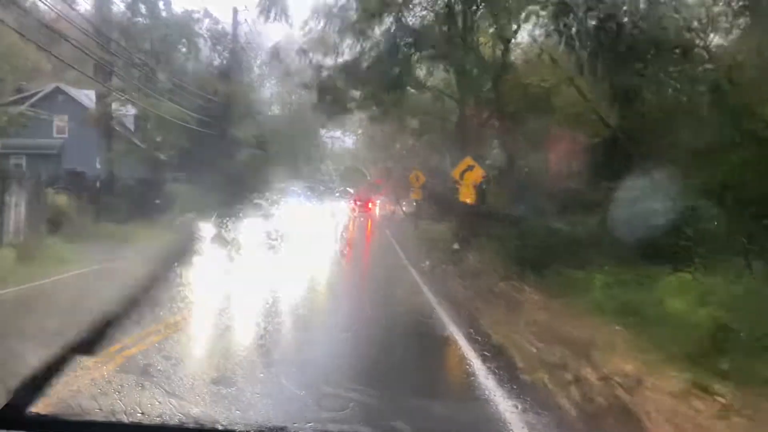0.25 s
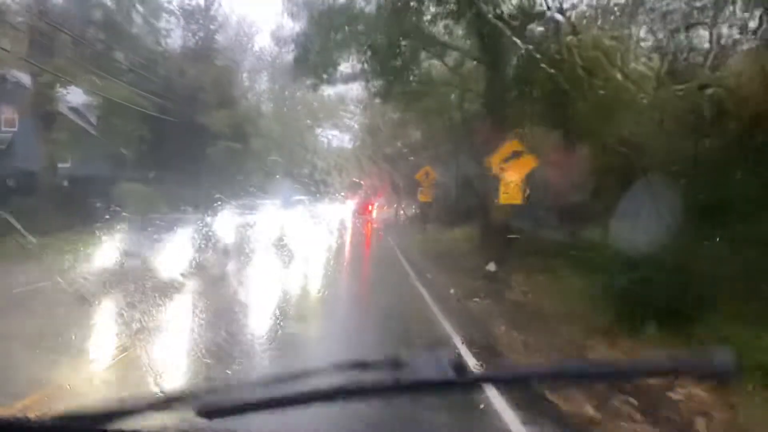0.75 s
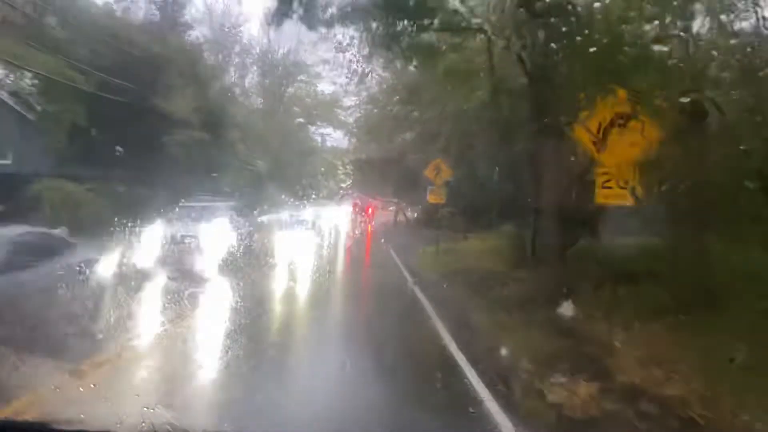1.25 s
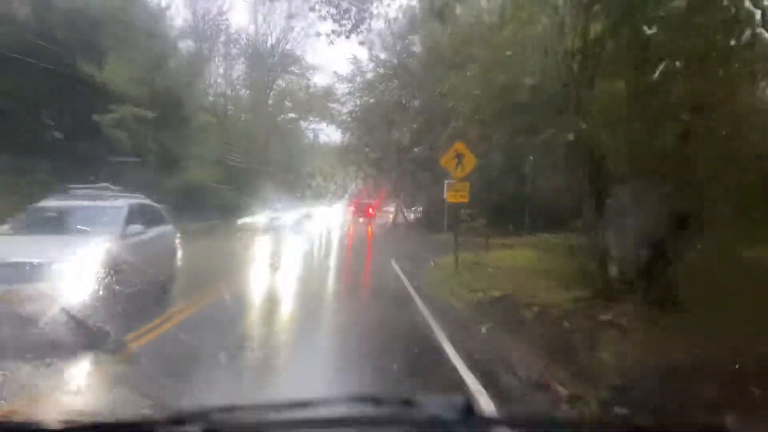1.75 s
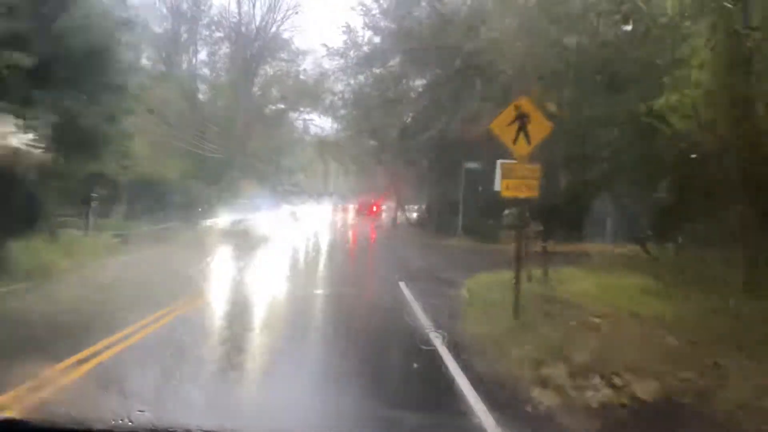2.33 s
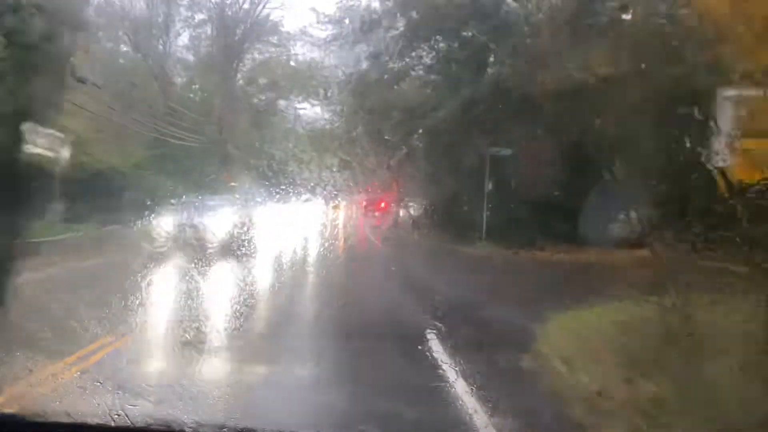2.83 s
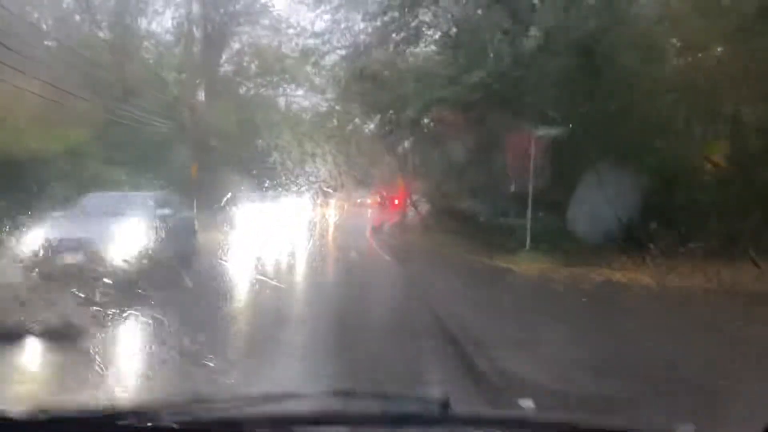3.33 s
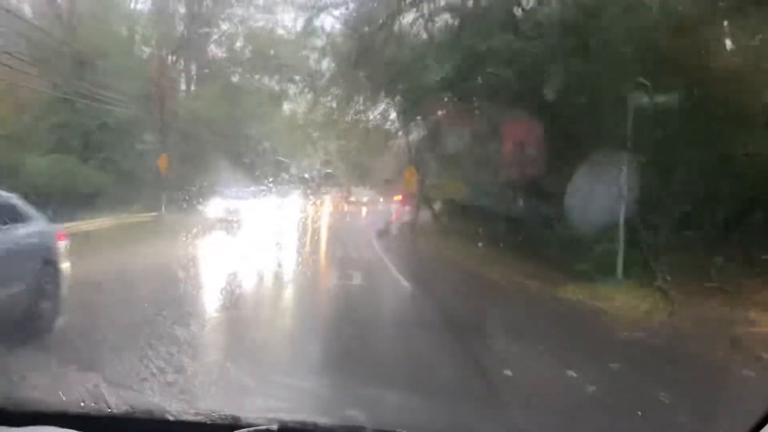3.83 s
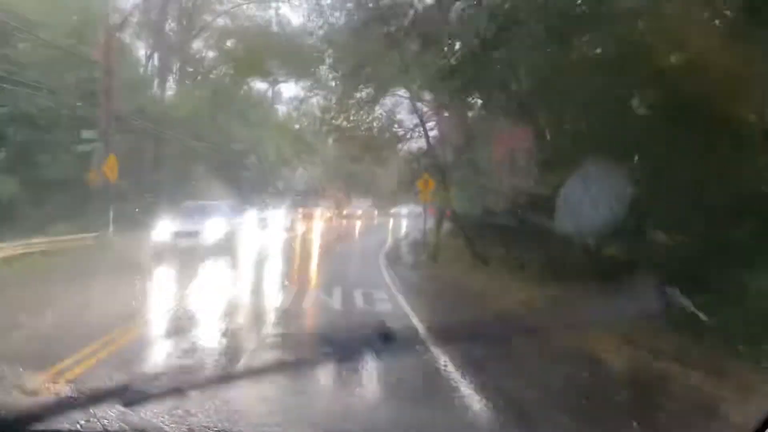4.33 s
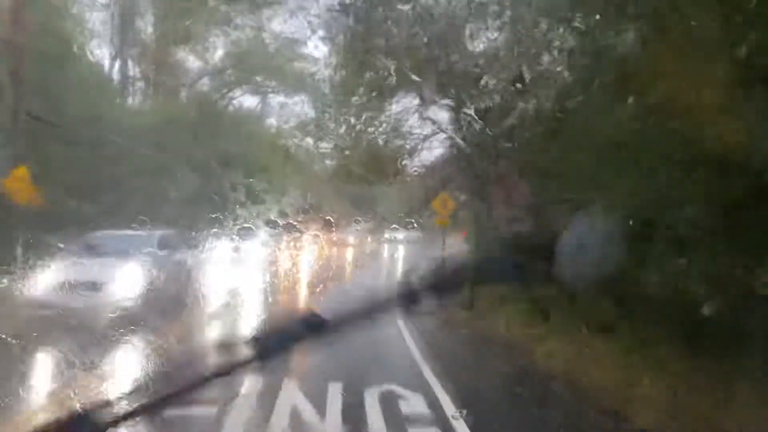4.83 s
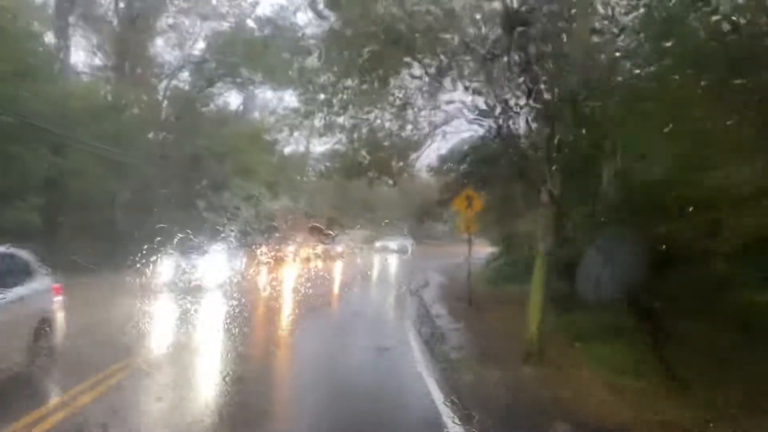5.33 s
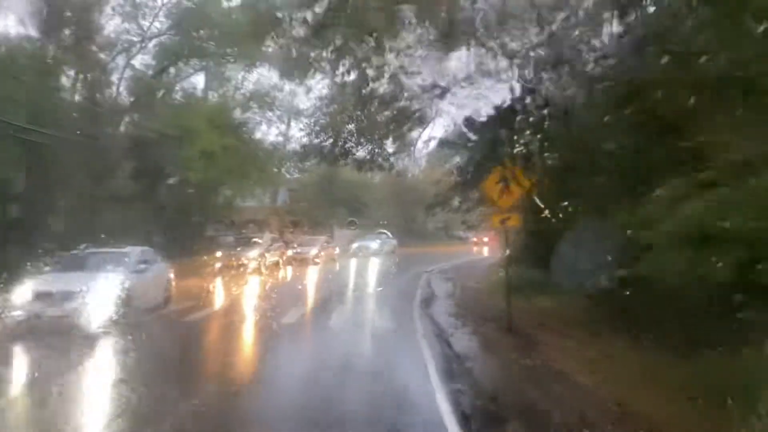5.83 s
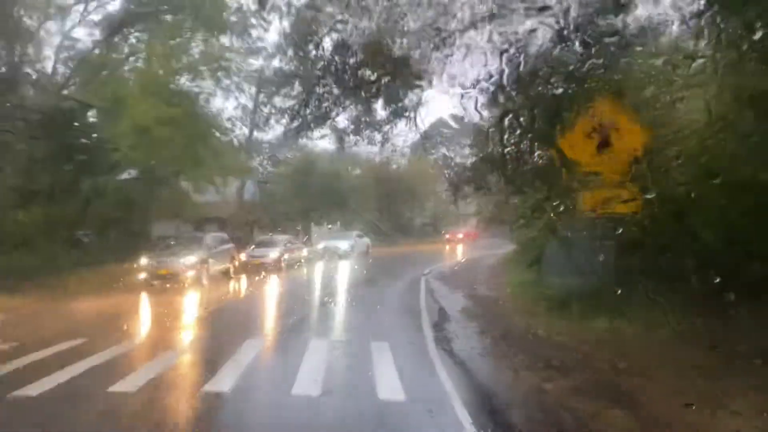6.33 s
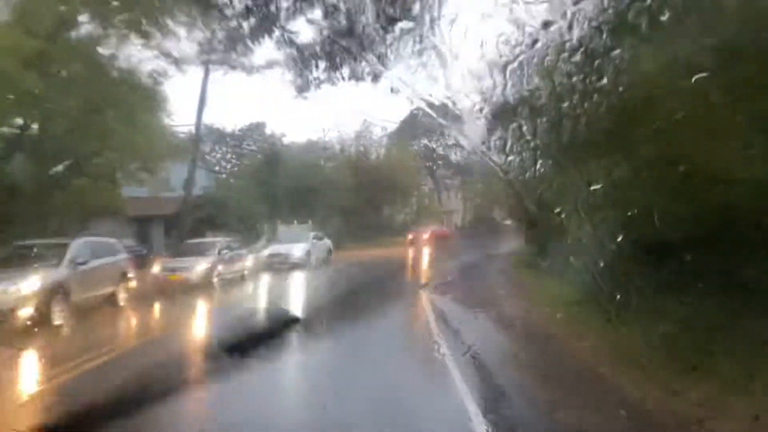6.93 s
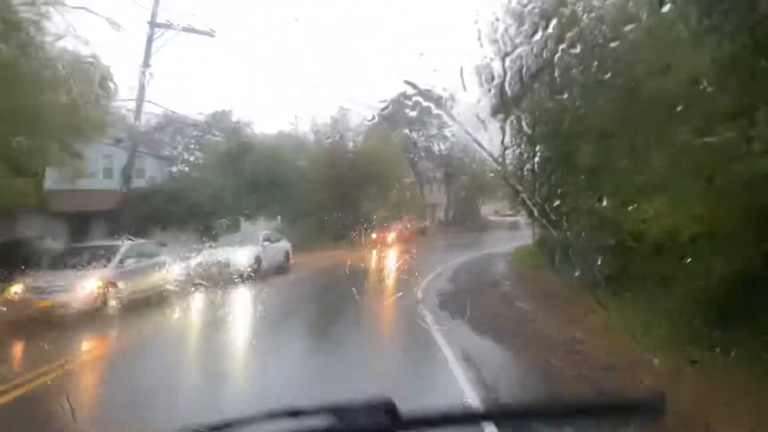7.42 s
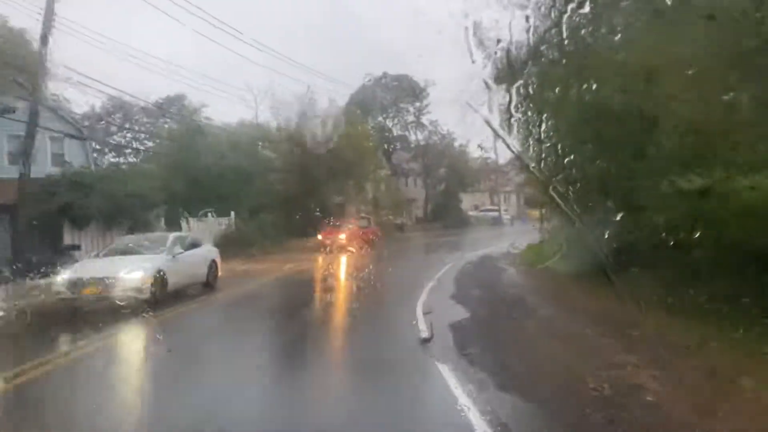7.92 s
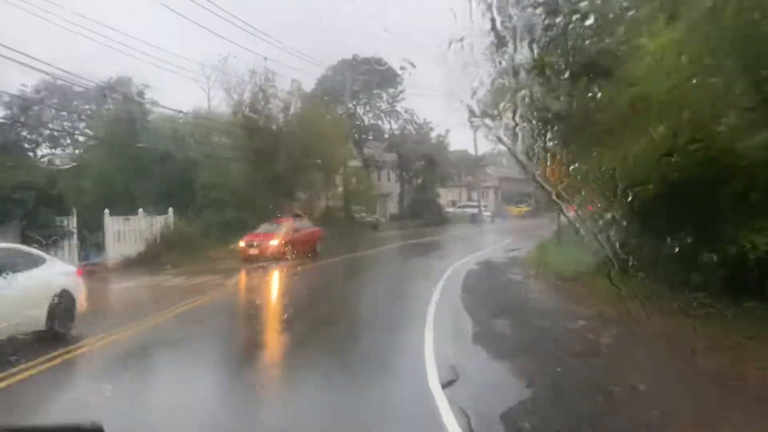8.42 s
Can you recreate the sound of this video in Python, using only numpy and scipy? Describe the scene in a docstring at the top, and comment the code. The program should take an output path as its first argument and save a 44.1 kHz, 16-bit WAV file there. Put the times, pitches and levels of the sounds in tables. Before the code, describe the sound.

Inside a car driving through heavy rain, low road rumble and watery hiss, wipers thumping steadily, fat drops smacking the windshield and roof in clusters.

```python
"""Inside a car on a wet road in heavy rain, heard by two small microphone ports near the windshield.
From the start the road booms in the cabin modes, the wipers thump at each turn, spray and fine rain hiss
as shaped noise, and small drops crackle. From 0.8 s heavy drops off the trees smack glass and roof as
short ringing noise bursts; from 1.1 s bumps jolt the cabin. At 3.4 s a piece of trim squeaks over a bump
as a rough tone. The drops thin out, the spray swells near 4.3 s, and drops gather again after 5 s."""
import sys
import numpy as np
from scipy import signal
from scipy.fft import rfft, irfft, next_fast_len
from scipy.io import wavfile

SR = 44100
rng = np.random.default_rng(int(sys.argv[2]) if len(sys.argv) > 2 else 0)


def invert_db(level):
    """Linear amplitude ratio for a level in decibels (20 dB per decade), elementwise."""
    return 10 ** (np.asarray(level, dtype=float) / 20)


def generate_wav(sig):
    """Save sig (samples, or channels by samples) to the path in sys.argv[1] as 16-bit PCM at SR."""
    pcm = np.round(np.clip(np.atleast_2d(sig).T, -1, 1) * 32767).astype(np.int16)
    wavfile.write(sys.argv[1], SR, pcm)


N = 382347


def rms_one(x):
    """Scales a signal to an rms of 1."""
    return x / np.sqrt(np.mean(x ** 2) + 1e-20)


def in_time(rows):
    """Columns of a curve at every sample."""
    s, *columns = np.transpose(rows)
    return [np.interp(np.arange(N) / SR, s, c) for c in columns]


def drift(rate):
    """Slow random wander of spread 1: noise through two equal low-passes at rate Hz."""
    hop = 40   # samples between wander points
    r = np.exp(-2 * np.pi * rate * hop / SR)
    slow = signal.lfilter([1], [1, -2 * r, r * r], rng.standard_normal(N // hop + 2002))
    slow = slow[2000:]   # leaves out the settling
    return np.interp(np.arange(N) / hop, np.arange(len(slow)), rms_one(slow - slow.mean()))


def swells(events):
    """Power of soft swells given as (middle s, dB, length s)."""
    t = np.arange(N) / SR
    return sum(invert_db(db) ** 2 * np.exp(-((t - s) / (length / 2)) ** 2) for s, db, length in events)


def resonance(x, hz, width_hz):
    """Two-pole resonance, gain 1 on top."""
    r = np.exp(-np.pi * width_hz / SR)
    poles = [1, -2 * r * np.cos(2 * np.pi * hz / SR), r * r]
    return signal.lfilter([(1 - r * r) / 2, 0, (r * r - 1) / 2], poles, x)


def dying(clicks, t60):
    """Power of each click fading 60 dB in t60 seconds."""
    return signal.lfilter([1], [1, -10 ** (-6 / (t60 * SR))], clicks + 1e-18)


def shaped_noise(spectrum, excite):
    """Half-octave bands on two paths, each excited in its own way from white noise, then coloured."""
    edges = 300 * 2 ** np.arange(0, 6.1, .5)
    white, out = rng.standard_normal((2, 2, N)), 0
    for k, (low, high) in enumerate(zip(edges, edges[1:])):
        sos = signal.butter(2, [low, high], "band", fs=SR, output="sos")
        excited = excite(np.sqrt(low * high), white[k % 2])
        out = out + signal.sosfilt(sos, excited)
    size = next_fast_len(N)
    hz = np.maximum(np.fft.rfftfreq(size, 1 / SR), 1)
    colour_hz, colour_db = np.transpose(spectrum)
    gain = invert_db(np.interp(np.log(hz), np.log(colour_hz), colour_db))
    # the colour is levelled by its 1.5 to 9 kHz range
    gain /= np.sqrt(np.mean(gain[(hz > 1500) & (hz < 9000)] ** 2) * 7500 / (SR / 2))
    return irfft(rfft(out, size) * gain, size)[:, :N]


# roughness of the road, as the push behind its deep boom: (time [s], level [dB])
ROAD_ROUGHNESS = [(0.0, -29.5), (0.82, -28), (1.23, -24.5), (1.37, -27), (2.46, -24.5), (2.61, -27),
                  (3.04, -31), (3.45, -23.5), (3.72, -29), (3.89, -24.5), (4.32, -30.5), (6.93, -24.5),
                  (7.05, -24.5), (8.67, -27)]


def road():
    """Road roughness as push power: deep boom, floor drumming and tyre hum, the last two swinging less."""
    boom_db, = in_time(ROAD_ROUGHNESS)
    swing_db = boom_db + 28
    follows = 0.39   # share of the boom's swing in drumming and hum
    drumming_db, hum_db = -32 + follows * swing_db, -39 + follows * swing_db
    return invert_db(boom_db) ** 2, invert_db(drumming_db) ** 2, invert_db(hum_db) ** 2


# cabin and body modes: (frequency [Hz], width [Hz], gain [dB])
CABIN_MODES = [(36, 17.6, -7), (51.8, 16.4, -5.5), (68.6, 15.6, 1.5), (84, 15.8, -1.5), (120.7, 18.7, 0.5),
               (149.3, 24.4, -7), (195, 27.3, -11), (246.8, 32.5, -2), (297.4, 25.8, 2.5)]


def cabin():
    """Road, wipers and bumps push every mode with noise; each mode rings as two resonances in a row."""
    boom, drumming, hum = road()
    thump, wiper_heave, shudder = wipers()
    bump_boom, bump_heave, jolt = bumps()
    heave_top_hz, boom_top_hz, drum_top_hz = 60, 100, 215
    deep_share_db = -3.0   # part of the boom that one deep mode carries
    bump_hum_db, shudder_hum_db = -9, -17.0   # parts reaching the highest modes
    out = 0
    for hz, width_hz, gain_db in CABIN_MODES:
        if hz < heave_top_hz:
            power = invert_db(deep_share_db) ** 2 * (boom + bump_heave + wiper_heave)
        elif hz < boom_top_hz:
            power = invert_db(deep_share_db) ** 2 * (boom + bump_boom + thump)
        elif hz < drum_top_hz:
            power = drumming + jolt + shudder
        else:
            power = hum + invert_db(bump_hum_db) ** 2 * jolt + invert_db(shudder_hum_db) ** 2 * shudder
        # narrow modes are pushed by denser noise, to make up for their width
        push = rng.standard_normal((2, N)) * np.sqrt(power * SR / (np.pi * width_hz))
        softened = resonance(push, hz, 3.34 * width_hz)
        out = out + invert_db(gain_db) * resonance(softened, hz, width_hz)
    return out


# wiper turns, bottom row then top row: (shudder level [dB], deep thump level [dB], length [s])
WIPER_TURN_SOUNDS = [(-23, -20, 0.092), (-31, -26, .07)]


def wipers():
    """Push power of the wiper arms turning round: deep thump, weaker heave of the lowest modes, shudder."""
    start_s, sweep_s = 0.0085, 1.326   # first landing at the bottom; one sweep up and down
    top_at = 0.482   # share of the sweep at which the arms turn at the top
    heave_db = -9   # against the thump
    turns = []
    for k in range(7):
        for top in (0, 1):
            turns.append((start_s + sweep_s * (k + top_at * top), *WIPER_TURN_SOUNDS[top]))
    thump = swells([(s, db, length) for s, _, db, length in turns])
    heave = swells([(s, db + heave_db, length) for s, _, db, length in turns])
    shudder = swells([(s, db, length) for s, db, _, length in turns])
    return thump, heave, shudder


# water dripping off trees overhead: (time [s], level [dB])
TREE_DRIP = [(0, -41.5), (.5, -44), (.95, -42.5), (1.05, -39.5), (1.3, -38), (1.55, -40), (1.8, -38.5),
             (2.05, -37.5), (2.22, -40), (2.4, -39), (2.7, -39), (3.0, -40.5), (3.5, -41.5), (4.5, -41),
             (5.4, -42.5), (5.6, -36), (5.7, -39.5), (5.83, -38), (5.94, -40.5), (6.02, -39), (6.22, -43),
             (6.6, -37), (6.9, -38), (7.18, -42), (7.3, -39), (7.75, -39.5), (7.87, -36.5), (8.05, -39.5),
             (8.35, -43.5), (8.67, -37)]


def drip_swing():
    """How far the drip off the trees rises above open sky, in dB."""
    open_sky_db = -42
    return in_time(TREE_DRIP)[0] - open_sky_db


# colour of the hiss: (frequency [Hz], density [dB per Hz, relative])
HISS_COLOUR = [(330, -1.5), (450, -4.5), (620, 1), (800, -5.5), (1200, -8), (2000, -12), (3200, -11.5),
               (4800, -13.5), (5600, -16.5), (7500, -23.5), (10000, -27.5), (11800, -38), (13000, -42),
               (15500, -43)]
# spray thrown up from the road, as a change of the hiss: (time [s], level [dB])
SPRAY_CHANGE = [(0, 0), (.5, -0.5), (1.5, -1), (2.6, -2), (4.3, 2), (5.0, 1.6), (5.6, -4), (6.4, -0.5),
                (7.6, -1.2), (8.1, 1.9), (8.67, 0.3)]


def hiss():
    """Spray and fine rain: smooth noise, patchy by band; the roof roar swells its low end."""
    hiss_db = -38.5 + in_time(SPRAY_CHANGE)[0]
    roar_db = -40 + 0.77 * drip_swing()   # the roar follows part of the drip's swing
    together = drift(5.2)   # wander common to all bands

    def patchy(hz, white):
        """Roof roar in the low bands gives way to spray by 2200 Hz; each band flutters by itself too."""
        roof = np.clip(np.log2(2200 / hz) / 0.74, 0, 1)
        level_db = (1 - roof) * hiss_db + roof * roar_db
        return white * invert_db(level_db + 0.96 * together + 0.5 * drift(15))
    return shaped_noise(HISS_COLOUR, patchy)


def small_drops():
    """Small drops fall at random, more and louder as the drip grows; returns their click power."""
    swing_db = drip_swing()
    open_sky_per_s, rate_follows = 160, 1.4   # rate before it wanders; its growth with the drip
    rate = open_sky_per_s * invert_db(rate_follows * swing_db + 4 * drift(7))
    born = rng.random(N) < rate / SR
    level_db = -48 + 0.78 * swing_db
    return born * invert_db(level_db + 4.4 * np.minimum(rng.exponential(1, N), 3)) ** 2


# colour of a drop's smack: (frequency [Hz], density [dB per Hz, relative])
SMACK_COLOUR = [(330, -7.5), (450, -3), (620, -2), (800, -0.45), (1200, -4.5), (2000, -7.5), (3200, -5.5),
                (4800, -6), (5600, -11.5), (7500, -18.5), (10000, -23.5), (11800, -28.5), (13000, -40),
                (15500, -36)]
# heavy drops, and at 3.36 s and 3.396 s two low knocks as the wipers turn, played the same way: (time [s], peak
# level [dB], thud level [dB against peak], splash level [dB against peak])
HEAVY_DROPS = [(0.7704, -30, -12, -18), (0.8164, -30, -15, -21), (0.9865, -22, -9, -18.5),
               (1.0106, -18.5, -14, -37), (1.0614, -32, -8, -25), (1.0784, -24.5, -6, -26),
               (1.1373, -22.5, -6.5, -26), (1.1884, -27, -4, -17), (1.2254, -23.5, -7, -25),
               (1.2825, -29, -8, -26), (1.2994, -23, -8, -21), (1.3289, -24, -4.5, -33),
               (1.3435, -20.5, -13, -16.5), (1.3766, -19.5, -8, -24), (1.3924, -20, -18, -29),
               (1.4217, -27, -8, -24), (1.4492, -16.5, -15, -22), (1.476, -23, -10, -32),
               (1.5244, -23.5, -9, -28), (1.5652, -23.5, -13, -19), (1.61, -18, -12.5, -28),
               (1.6666, -22, -25, -21), (1.709, -23, -6, -19), (1.7408, -16, -16, -24),
               (1.7918, -22.5, -11, -31), (1.8267, -23, -14, -24), (1.8572, -23.5, -13, -24),
               (1.8687, -21.5, -19, -23), (1.9235, -34, -9, -19), (1.9565, -34, -12, -19),
               (1.9664, -24, -14, -20), (1.9984, -18.5, -12.5, -31), (2.0494, -26, -9, -20),
               (2.0732, -21, -7, -18), (2.1574, -27, -2.5, -31), (2.2653, -27, -3.5, -27),
               (2.2822, -20, -19, -28), (2.3181, -27, -14, -24), (2.3388, -19.5, -14, -21),
               (2.4114, -31, -10, -23), (2.4266, -23.5, -7, -22), (2.446, -27.5, -0.5, -32),
               (2.5117, -24, -9, -17.5), (2.6152, -17, -14, -21), (2.6754, -28.5, -5, -16),
               (2.7227, -23.5, -6.5, -25), (2.7317, -21.5, -13, -24), (2.819, -31, -9, -22),
               (2.8399, -26, -4, -21), (2.9573, -24.5, -11, -26), (3.1153, -25.5, -6.5, -26),
               (3.184, -24.5, -6, -22), (3.36, -25.5, -2.5, -20), (3.3956, -31.5, 1.5, -20),
               (3.462, -23, -7, -22), (5.0988, -24, -12, -22), (5.2297, -24.5, -10, -20),
               (5.3198, -30, -9, -20), (5.353, -25.5, -8, -32), (5.44, -18, -18, -19),
               (5.4557, -23, -19, -17), (5.4714, -19.5, -7.5, -21), (5.507, -14.5, -16, -19.5),
               (5.5707, -21.5, -11, -24), (5.5842, -19, -18, -27), (5.595, -16, -15, -22.5),
               (5.6146, -19, -13, -17), (5.6432, -22, -9, -20), (5.7079, -24.5, -16, -23),
               (5.742, -25, -4, -22), (5.77, -24, -6, -25), (5.8048, -18.5, -11, -19),
               (5.8274, -23, -8, -18), (5.8493, -21, -14, -20), (5.8711, -22, -8, -17.5),
               (5.9658, -29, -4, -25), (5.9778, -21, -13, -24), (6.0101, -23.5, -2.5, -21),
               (6.033, -18.5, -24, -24), (6.1767, -25.5, -22, -19), (6.2088, -26.5, -19, -21),
               (6.276, -22, -16, -20), (6.3245, -24, -15, -23), (6.35, -20, -11, -24),
               (6.3729, -20.5, -7.5, -25), (6.4904, -22, -12, -18), (6.5445, -30.5, 1.5, -17),
               (6.625, -29, 0, -30), (6.6667, -24, -5, -27), (6.7421, -20.5, -12, -25),
               (6.7694, -25, -9, -23), (6.8029, -25, -5, -20), (6.8585, -20.5, -6, -17),
               (6.9117, -22, -11, -18), (7.006, -26.5, -11, -17), (7.2155, -27, -8, -29),
               (7.2628, -18.5, -6, -16.5), (7.29, -23, -6, -15), (7.3413, -11.5, -17.5, -23),
               (7.4006, -20.5, -11, -19), (7.426, -24, -13, -13.5), (7.456, -22.5, -22, -27),
               (7.4779, -21, -14, -20), (7.4954, -20.5, -12, -15), (7.5308, -25, -14, -20),
               (7.549, -16.5, -21, -31), (7.5834, -27.5, -6, -20), (7.5951, -15, -13, -31),
               (7.6291, -19, -11.5, -25), (7.6393, -17.5, -13, -32), (7.6824, -28, 0, -32),
               (7.7, -22.5, -6, -31), (7.758, -21, -6, -30), (7.8174, -15.5, -18, -20),
               (7.8274, -14, -15, -24), (7.8536, -19, -9, -16), (7.9007, -25, -7, -14),
               (7.918, -24, -1.5, -18), (7.9844, -31, 5, -29), (8.4118, -22.5, -18, -25),
               (8.4248, -22.5, -25, -25), (8.4771, -23.5, -11, -24), (8.5195, -25.5, -6, -18),
               (8.5914, -17, -16, -18.5)]


def drops():
    """Each drop is a sharp push and a crack of a few ms; glass and cabin ring on, shorter in the treble."""
    small = small_drops()
    s, peak_db, thud_db, splash_db = np.transpose(HEAVY_DROPS)
    at = (s * SR).astype(int)
    usual_thud_db, usual_splash_db = -10.5, -21   # colour of an average heavy drop
    heavy_share_db = -2.5   # part of a heavy drop's peak that one band carries

    def struck(hz, white):
        """Thud tints the low bands, splash the high ones; the blow is softer in the low bands."""
        place = np.interp(np.log(hz), np.log([900, 3500, 8000]), [-1, 0, 1])
        thud_tint_db = max(-place, 0) * (thud_db - usual_thud_db)
        splash_tint_db = max(place, 0) * (splash_db - usual_splash_db)
        chance_db = 1.47 * rng.standard_normal(len(at))
        power = small * invert_db(3.46 * drift(91)) ** 2   # small drops vary in colour
        power[at] += invert_db(peak_db + heavy_share_db + thud_tint_db + splash_tint_db + chance_db) ** 2
        sharp = invert_db(3.0 + 4.2 * min(place, 0))
        crack = sharp ** 2 * dying(power, 0.0095)
        scale = (3500 / hz) ** 0.3   # ringing time against that at 3500 Hz
        ring = invert_db(-6.0) ** 2 * dying(power, 0.1 * scale) + invert_db(-12.5) ** 2 * dying(power, 0.15 * scale)
        push = invert_db(5.0) * sharp * np.sqrt(power) * [[1], [-1]]   # opposite sign on the two paths
        return white * np.sqrt(crack + ring) + push
    return shaped_noise(SMACK_COLOUR, struck)


# bumps in the road: (time [s], boom level [dB], length [s], floor drumming level [dB against boom])
ROAD_BUMPS = [(1.1, -21.5, 0.065, -9), (2.37, -29, 0.032, -11), (2.565, -26, 0.073, 0.5),
              (2.843, -31.5, 0.087, 4), (3.357, -22.5, 0.043, -1), (3.426, -19.5, 0.094, -6),
              (3.53, -24, 0.044, -7), (3.834, -20, 0.18, -12), (4.868, -17.5, 0.093, -14),
              (5.49, -24.5, 0.035, -13), (5.794, -20.5, 0.09, -15), (5.887, -24, .04, -9),
              (6.18, -24, .04, -10), (6.243, -20, 0.067, -18), (6.488, -22, .05, -12),
              (6.967, -20.5, 0.095, -12), (7.494, -24.5, 0.099, -10), (7.617, -26, 0.064, -11),
              (7.715, -17, 0.037, -21), (8.396, -23.5, 0.054, -14), (8.652, -23, 0.066, -4)]


def bumps():
    """Push power of the bumps: boom, heave of the lowest modes (stronger for long bumps), floor jolt."""
    even_length_s, growth = 0.076, 1.3   # length at which heave equals boom; power law
    boom = swells([(s, db, length) for s, db, length, _ in ROAD_BUMPS])
    heave = swells([(s, db + 10 * growth * np.log10(length / even_length_s), length)
                    for s, db, length, _ in ROAD_BUMPS])
    jolt = swells([(s, db + rel_db, length) for s, db, length, rel_db in ROAD_BUMPS])
    return boom, heave, jolt


# upper lines of the squeak: (multiple of the tone [ratio], level [dB])
SQUEAK_UPPER_LINES = [(2.6, 0), (3.72, -9), (4.65, -6)]
# slips of the trim: (middle time [s], length [s], tone level [dB], upper line level [dB])
TRIM_SLIPS = [(3.412, .044, -42, -51), (3.46, 0.018, -47, -45), (3.476, 0.013, -30, -51)]


def squeak():
    """Stick-slip of plastic trim: a slightly rough tone with upper lines, swelling at each slip."""
    tone_hz = 1858 * (1 + 0.012 * drift(200))
    phase = 2 * np.pi * np.cumsum(tone_hz) / SR
    upper = sum(invert_db(db) * np.sin(k * phase) for k, db in SQUEAK_UPPER_LINES)
    tone_power = swells([(s, db, length) for s, length, db, _ in TRIM_SLIPS])
    upper_power = swells([(s, db, length) for s, length, _, db in TRIM_SLIPS])
    tone = np.sqrt(2 * tone_power) * np.sin(phase) + np.sqrt(2 * upper_power) * upper
    return tone * invert_db(3.2 * drift(120) + [[0], [1.5]])   # 1.5 dB stronger on the second path


def scene():
    """Two paths through the cabin, with noise of their own."""
    return cabin() + hiss() + drops() + squeak()


def roll_off(x):
    """The treble ends steeply here."""
    return signal.sosfilt(signal.butter(12, 15970, fs=SR, output="sos"), x)


# the two ports: (frequency [Hz], right below left [dB], shared over stray sound [dB], right phase turn [rad])
PORT_PAIR = [(25, -0.9, 22, -.02), (69, -1.9, 14, -0.08), (146, -3.4, 11, 0.32), (303, 1, -0.5, -1.26),
             (468, 6, -7, -1), (622, 3.5, 0, -1.0), (900, 3.5, -17, -4.5), (1500, 3, -7, -4.5),
             (1920, 3.5, -21, -6), (2520, 3.5, -9, -8.0), (3530, 13, -14, -12), (4400, 17, -7, -11.5),
             (4950, 19, -19, 3), (6030, 18.5, -8, 1), (7350, 11, -12, -3), (8180, 4, 3, -3),
             (9300, 1.5, 0, -0.7), (9800, -2, 17, -0.65), (15760, 2, 13, 10)]


def record(dry):
    """The right port hears the left path in part, turned in phase, and is shaded most near 5 kHz."""
    size = next_fast_len(N)
    hz, *columns = np.transpose(PORT_PAIR)
    shade_db, shared_db, turn = [np.interp(np.fft.rfftfreq(size, 1 / SR), hz, c) for c in columns]
    near, other = rfft(dry, size)
    shared = invert_db(shared_db)
    blend = (shared * np.exp(1j * turn) * near + other) / np.sqrt(1 + shared ** 2)
    right = irfft(invert_db(-shade_db) * blend, size)[:N]
    mix = np.array([dry[0], right])
    return roll_off(mix)


dry = scene()
out = record(dry)
generate_wav(out)
```